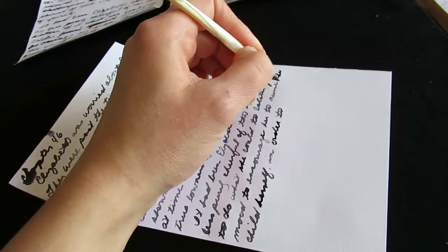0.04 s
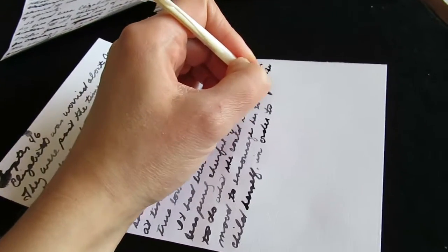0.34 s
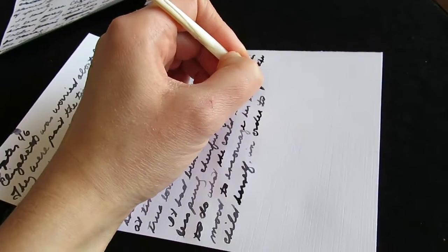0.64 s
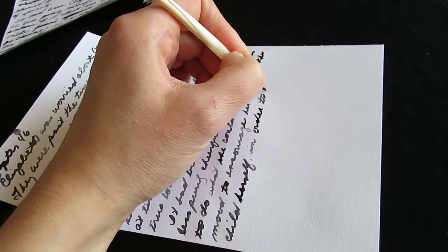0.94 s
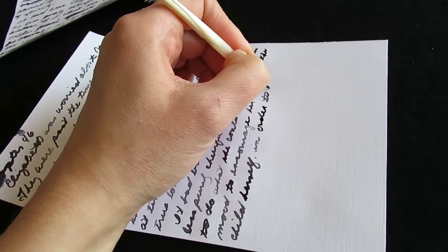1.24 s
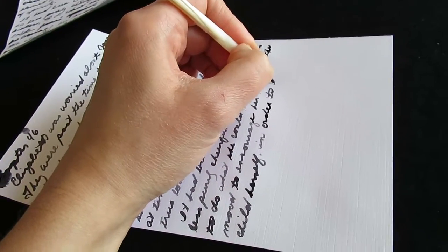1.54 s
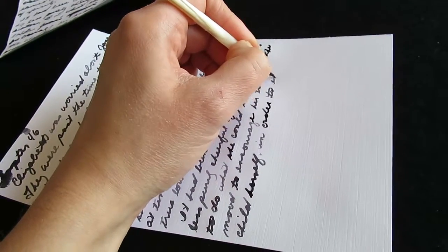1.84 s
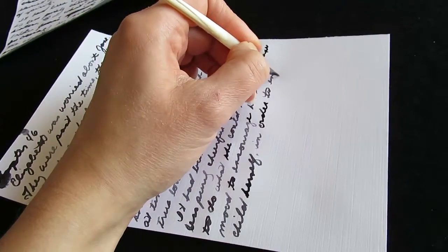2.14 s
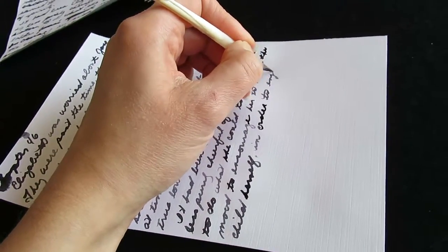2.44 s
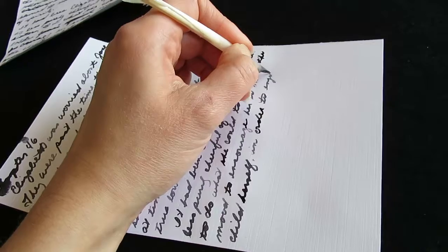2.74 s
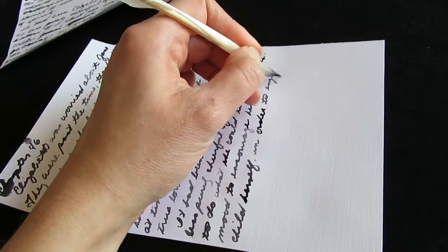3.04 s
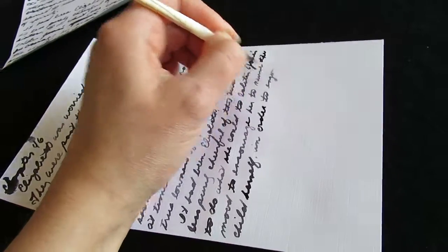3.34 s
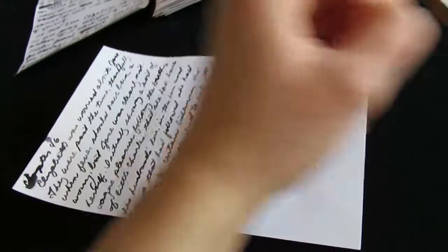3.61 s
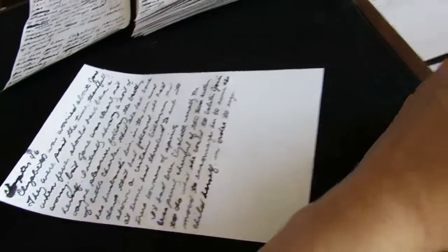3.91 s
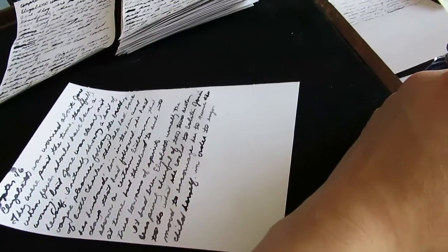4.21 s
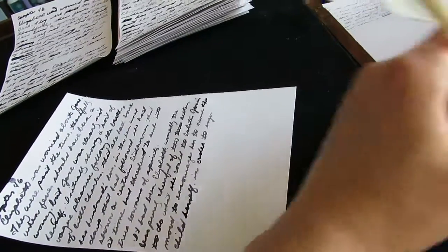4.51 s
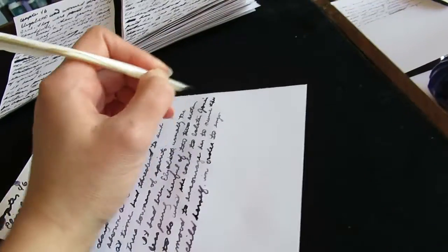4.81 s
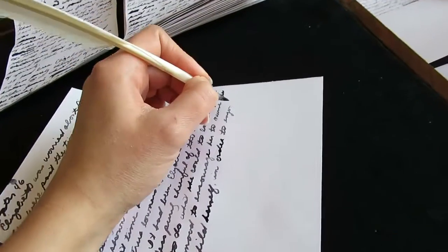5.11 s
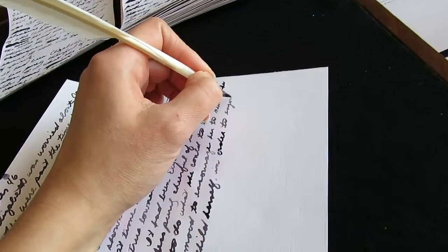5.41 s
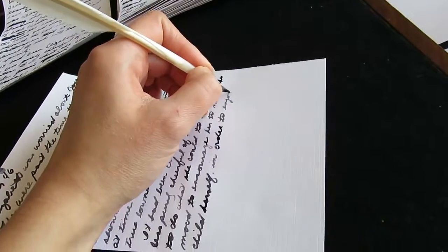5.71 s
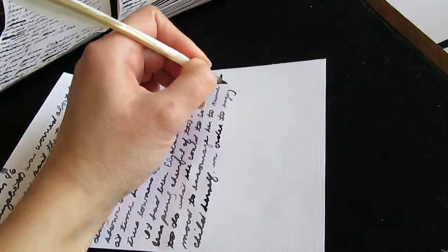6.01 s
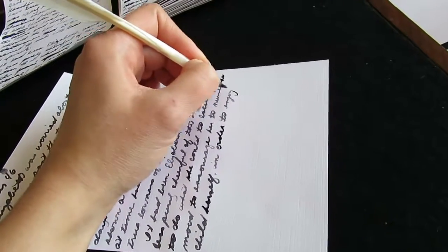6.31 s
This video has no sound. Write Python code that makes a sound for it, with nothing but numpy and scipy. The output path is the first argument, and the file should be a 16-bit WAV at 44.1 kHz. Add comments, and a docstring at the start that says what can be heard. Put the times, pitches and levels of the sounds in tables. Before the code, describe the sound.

A quiet room with low, steady air noise; at first a hand only brushes faintly over paper. At about 1.4 seconds a quill tip ticks down close to the microphone, and a faint, low appliance hum starts and stays to the end. From about 1.7 to 3.1 seconds the quill writes in short, bright scratches mixed with sharp little taps, strongest between 2.6 and 3.1 seconds, over the soft rub of skin on the page. The hand drags briefly, the tip ticks once more, and at about 3.3 seconds the hand bumps the wooden desk. A second, duller bump comes just before 4 seconds. Then there is only faint brushing. From about 5 seconds the hand scuffs lightly on the sheet, with a few very faint ticks and scratches of the tip and a slight, thin squeak of skin, until about 6.4 seconds.

```python
"""A quill writes a word on a sheet of paper lying on a wooden desk in a quiet room.
The nib ticks down, then moves in short strokes; stick-slip friction over the fibres excites the
resonances of quill and sheet. The hand brushes the page with friction noise and, on its way to the ink,
twice bumps the desk into free vibration. Behind them lie the room's air and a faint appliance hum."""
import sys
import numpy as np
from scipy import signal
from scipy.fft import rfft, irfft, next_fast_len
from scipy.io import wavfile
from scipy.ndimage import map_coordinates

SR = 44100
rng = np.random.default_rng(int(sys.argv[2]) if len(sys.argv) > 2 else 0)


def waveform_to_disk(signal):
    """Save audio, clipped to [-1, 1], as 16-bit WAV at the path in sys.argv[1]."""
    frames = np.transpose(np.atleast_2d(signal))
    scaled = np.clip(frames, -1, 1) * 32767
    samples = np.round(scaled).astype(np.int16)
    wavfile.write(sys.argv[1], SR, samples)


N = 280476
TIME = np.arange(N) / SR
SQUARE_HZ = 3873   # ring of a nib that meets the paper squarely


def nib_strokes(hollow_hz=294, push_db=-6, size=4096):
    """Forced vibration: friction drives the quill. Returns its sound and the force on the paper."""
    # t/s, length/s, level/dB, swell/dB, nib f/Hz (start, end), tine f/Hz (start, end),
    # slip rate/Hz (start, turn, end), roughness (0-1), sheet level/dB, edge level/dB
    strokes = [ (1.442, 0.0097, -48, -5, 4200, 4040, 11000, 10500, 2700, 1030, 650, 1, 4.5, 1),
               (1.696, 0.0074, -48, 3, 4100, 4200, 13000, 13000, 1300, 920, 710, 0.7, -5, -2),
               (1.71, 0.011, -39, 1, 4300, 4280, 13000, 13300, 1620, 1340, 860, .62, -1, -0.5),
               (1.778, 0.038, -45, -3, 2990, 3410, 14000, 13000, 1350, 1000, 740, 0.93, 5.5, 10),
               (1.823, 0.013, -61, 2, 2800, 2780, 13000, 13000, 1300, 1440, 1100, 1, 0, 0),
               (1.990, 0.044, -35.5, -1.5, 4470, 4600, 13000, 12500, 1260, 1800, 1380, 0.46, -4, 1),
               (2.034, 0.038, -42, 2, 3400, 3620, 13200, 13000, 2200, 1600, 550, 0.65, 5, 9),
               (2.186, .023, -37.5, -4, 2800, 2920, 13800, 13800, 1670, 980, 840, 0.56, -1, 11),
               (2.215, 0.047, -49, -1, 3100, 3620, 13300, 13200, 1380, 990, 910, 0.76, 5.5, 11.5),
               (2.265, .021, -36.5, 8, 4470, 4640, 12700, 13000, 1370, 1110, 920, 0.32, -4, 2),
               (2.283, 0.057, -52, -12, 3830, 2570, 13000, 13000, 1130, 1500, 1600, 1, 1, 11),
               (2.411, 0.031, -42, 1, 4425, 4450, 12000, 10700, 2050, 1380, 480, .45, -11, -1.5),
               (2.653, 0.021, -27.5, 3, 4460, 4546, 10000, 12300, 1450, 1150, 1110, 0.4, 0.5, 0),
               (2.674, 0.024, -36.5, -9, 4400, 2846, 13200, 13400, 1000, 1250, 1750, 0.65, 4, 11.5),
               (2.813, 0.056, -31.5, 6.5, 4580, 4626, 10800, 11100, 900, 1450, 360, 0.41, -5.5, -2.5),
               (2.927, .023, -41, 4, 2910, 3090, 13200, 13500, 1540, 1150, 720, 0.59, -4, 10.5),
               (2.991, .016, -39, 6, 3780, 3990, 13800, 13400, 2100, 1700, 1300, 0.5, 1, 9),
               (3.010, 0.02, -33, 7, 4655, 4410, 14000, 10100, 1660, 1300, 1250, .31, -2.5, 1.5),
               (3.03, .021, -32.5, 3, 4720, 4500, 10500, 11000, 1300, 1130, 1400, 0.53, 5, -9),
               (3.048, .024, -42, -4, 3250, 3020, 11000, 12000, 1450, 1480, 1450, .65, 7.5, 7),
               (3.072, 0.015, -35, 2, 3080, 3020, 13600, 13800, 1474, 1480, 1300, .55, 2, 12),
               (3.318, 0.0074, -38.5, 0, 4080, 4200, 12500, 12500, 1700, 2560, 2160, 0.78, -5, -0.5),
               (5.151, 0.031, -64, -8, 3020, 3160, 12500, 12500, 1500, 2040, 1800, 0.91, 1, -3),
               (5.79, .04, -61, 10, 3500, 4380, 12500, 12500, 650, 480, 400, 0.9, -9, -5),
               (6.309, .02, -66, 0, 3900, 4130, 12500, 12500, 800, 600, 500, .9, -5, -4)]
    sound, push, t = np.zeros(N), np.zeros(N), TIME[:size]
    for s, length, db, swell_db, nib0, nib1, tine0, tine1, *rates, rough, sheet_db, edge_db in strokes:
        ring_hz = np.interp(t, [0, length], [nib0, nib1])
        tine_hz = np.interp(t, [0, length], [tine0, tine1])
        force = amp(db) * fibre_catches(s + t) * stroke_force(t, length, swell_db, rates, ring_hz, rough)
        add(sound, s, quill(force, ring_hz, tine_hz, sheet_db, edge_db))
        add(push, s, amp(push_db) * force)
        # the nib's weight sounds the hollow under the sheet
        weight = amp(-2 + 0.62 * db) * contact(t, length) * rng.standard_normal(size)
        add(sound, s, resonance(lowpass(weight, 2 * hollow_hz), hollow_hz, width_hz=13))
    return sound, push


def stroke_force(t, length, swell_db, rates, ring_hz, rough, arch_db=2, grain_db=0.27, turn=0.38):
    """Sliding friction: the scratch swells or fades as its rasp glides through three given slip rates."""
    progress = ramp(t, length)
    contour_db = swell_db * (progress - .5) + arch_db * (np.sin(np.pi * progress) - 1)
    flutter_db = grain_db * wander(t, per_s=255)   # ridges of the paper
    rate = np.exp(np.interp(progress, [0, turn, 1], np.log(rates)))
    return contact(t, length) * amp(contour_db + flutter_db) * stick_slip(rate, ring_hz, rough)


def contact(t, length, bite_s=0.0035, lift_s=0.0037):
    """Contact envelope: 1 while the nib bears on the paper."""
    return ramp(t, bite_s) * ramp(length + lift_s / 2 - t, lift_s)


def stick_slip(per_s, ring_hz, rough, lock=0.61, jitter=0.3, uneven_db=1, rub_db=-8, count=600):
    """Entrainment: smooth slips pull into step with the nib's ring, rough ones scatter and rub; rms 1."""
    size = len(per_s)
    fibres = np.cumsum(np.exp(rough * jitter * rng.standard_normal(count))) - rng.random()
    free_at = np.searchsorted(np.cumsum(per_s) / SR, fibres)
    cycles = np.cumsum(ring_hz) / SR
    due = cycles[np.minimum(free_at, size - 1)]
    locked_at = np.searchsorted(cycles, due + lock * (1 - rough) * (np.round(due) - due))
    strength = amp(rough * uneven_db * rng.standard_normal(count)) * (due < cycles[-1])
    jolts = np.bincount(locked_at, strength, size)[:size] / np.sqrt(per_s)
    jolts = signal.lfilter([1, -1], [1, -np.exp(-2 * np.pi * 200 / SR)], jolts)   # 200 Hz high-pass
    return rms_one(rms_one(jolts) + rough * amp(rub_db) * rng.standard_normal(size))


def fibre_catches(t, half_s=0.0012):
    """Amplitude modulation of the force: raised fibres hold the nib back for an instant."""
    # catches: t/s, change of level/dB
    catches = [(1.811, -1), (1.835, 12), (1.9934, 8), (2.0, 8), (2.0063, 8), (2.0243, 4.5), (2.072, 5),
               (2.191, 3.5), (2.202, 9.5), (2.42, 9), (2.433, 9), (2.668, 4.5), (2.696, 4), (3.047, -3)]
    return amp(sum(db * np.exp(-.5 * ((t - s) / half_s) ** 2) for s, db in catches))


def quill(force, ring_hz, tine_hz, sheet_db=0, edge_db=0):
    """Modal resonance: on edge the nib rings higher and hisses; flatter, it drives the sheet harder."""
    # modes of the nib and of its split tip's tines: f/ring f, bandwidth/Hz, level/dB
    nib_modes = [(0.584, 319, -14.5), (.84, 352, -11), (1, 650, -1)]
    tine_modes = [(0.621, 1300, -10.5), (1, 2592, -3)]
    # modes of the sheet, the nib's edge and the shaft: f/Hz, bandwidth/Hz, level/dB
    sheet_modes = [(856, 120, -15), (1170, 200, -21.5), (1553, 68, -13.5), (1910, 190, -15),
                   (2770, 440, -21)]
    edge_modes = [(5030, 350, -14), (7320, 470, -13), (9270, 710, -15), (10300, 570, -14.5),
                  (12000, 600, -23)]
    shaft_modes = [(2960, 900, -3.5), (4360, 200, -1.5), (4720, 510, -2)]
    octaves = np.log2(ring_hz / SQUARE_HZ)
    # each spot on the sheet shifts and favours other modes, which glide as the nib travels
    octaves_per_s = 3.5 * rng.standard_normal()
    travel_hz = SQUARE_HZ * 2 ** (octaves_per_s * TIME[:len(force)])
    spot = [(hz / SQUARE_HZ * (1 + 0.037 * rng.standard_normal()), width, db + 3.5 * rng.standard_normal())
            for hz, width, db in sheet_modes]
    sheet = amp(sheet_db - 8 * octaves) * gliding(force, travel_hz, spot)
    hiss = bank(force, edge_modes) + gliding(force, tine_hz, tine_modes)
    body = lowpass(gliding(force, ring_hz, nib_modes) + sheet, 7500)
    tip = lowpass(body + amp(edge_db - 7 + 28.5 * octaves) * hiss, 15300, order=5)
    grip = 1 + 0.02 * rng.standard_normal()   # the fingers detune the shaft
    return tip + sum(amp(db) * resonance(tip, hz * grip, width) for hz, width, db in shaft_modes)


def nib_ticks(gain_db=1, tine_hz=13200, size=4096):
    """Impulse response: the nib lands or snags. Returns its sound and the force on the paper."""
    # impacts: t/s, level/dB, nib f/Hz
    ticks = [ (0.913, -35, 3200), (1.4161, -14.5, 4010), (1.784, -27, 2860), (1.899, -24, 3760),
             (1.9603, -16.5, 2700), (2.1646, -10.5, 2750), (2.237, -16, 2960), (2.5093, -13.5, 4380),
             (2.5790, -21, 3730), (2.8075, -7.5, 4300), (2.8710, -10, 4540), (2.914, -16.5, 2620),
             (2.9858, -5.5, 4470), (3.0827, -17.5, 3120), (3.3094, -14.5, 3400), (5.659, -38, 3780),
             (5.828, -34, 4630)]
    sound, push = np.zeros(N), np.zeros(N)
    for s, db, ring_hz in ticks:
        force = amp(gain_db + db) * (TIME[:size] == 0)
        snap = force - lowpass(force, 1500, order=1)   # too brief to move the sheet's slow modes much
        add(sound, s, quill(snap, np.full(size, ring_hz), np.full(size, tine_hz), edge_db=3))
        add(push, s, amp(0.5 - 11 * np.log2(ring_hz / SQUARE_HZ)) * force)   # on edge it pushes less
    return sound, push


def nib_skims():
    """Narrow-band friction noise: when the nib barely touches, only its tines sizzle."""
    # weightless passes: middle t/s, half length/s, level/dB
    skims = [(1.75, .07, -68), (2.053, .03, -66), (2.26, .07, -57), (2.513, .04, -67), (2.697, .015, -55),
             (2.89, .025, -52), (3.108, .032, -59)]
    envelope = np.linalg.norm([swell(*row) for row in skims], axis=0)
    return envelope * rms_one(resonance(rng.standard_normal(N), 13000, width_hz=2200))


def hand_bumps(size=1024):
    """Soft impact: the softer the hand's blow, the longer the push and the lower its cut-off."""
    # blows on the desk: t/s, level/dB, cut-off f/Hz
    blows = [(3.284, -53, 1490), (3.3275, -34.5, 3020), (3.33, -24.5, 1590), (3.3340, -26, 298),
             (3.9495, -26, 630), (3.9521, -22.5, 344)]
    force, impulse = np.zeros(N), 1. * (TIME[:size] == 0)
    for s, db, soft_hz in blows:
        add(force, s, amp(db) * lowpass(impulse, soft_hz, order=3))
    return force


def desk(force):
    """Damped plate vibration: blows set the desk top ringing; a panel radiates no deep bass."""
    # modes of the top: f/Hz, level/dB, T60/s
    modes = [(141.6, -7, 0.34), (170, -10, 0.14), (219, -7, 0.13), (255, -3.5, 0.082), (283.2, -14, 0.3),
             (369, -14.5, 0.073), (411, -2.5, 0.035), (488, -18, 0.088), (720, -12, .036),
             (1000, -11, 0.046), (1300, 0, 0.024), (1590, -19, .018), (1770, -16, .016)]
    ringing = 0
    for hz, db, t60 in modes:
        r, w = amp(-60 / (t60 * SR)), 2 * np.pi * hz / SR
        ringing += amp(db) * signal.lfilter([.5, 0, -.5], [1, -2 * r * np.cos(w), r * r], force + 1e-18)
    return highpass(ringing, 115, order=3)


def hand(word_start_s=1.56, word_end_s=3.5, word_fade_s=0.054, arm_fade_s=0.097, settled_s=5.8):
    """Friction of skin on paper: light contact brushes brightly, weight gives a darker drag."""
    # finger scuffs, and the heel of the hand dragging: middle t/s, half length/s, level/dB
    scuffs = [(0.011, 0.047, -62.5), (0.233, 0.017, -58.5), (0.343, 0.046, -66.5), (1.027, 0.018, -63),
              (1.114, 0.019, -60.5), (1.265, 0.011, -63), (1.467, 0.093, -65), (1.581, 0.012, -56.5),
              (1.724, 0.05, -58.5), (3.381, 0.0048, -53.5), (3.529, 0.011, -60.5), (3.595, 0.015, -60.5),
              (3.75, 0.0099, -64), (3.97, 0.04, -64.5), (4.577, 0.017, -65.5), (5.052, 0.061, -65.5),
              (5.165, 0.02, -58.5), (5.256, 0.027, -61.5), (5.878, 0.08, -59.5), (6.322, 0.014, -60)]
    heel_drag = (3.135, 0.023, -47.5)
    # the arm travels to the ink and back, then settles: t/s, level/dB
    arm_level = [(3.45, -66), (3.77, -77), (3.98, -62), (4.54, -77), (4.57, -66), (5.69, -78), (5.87, -63),
                 (6.36, -59.5)]
    # modes of dragging skin and of the sheet under the hand's weight: f/Hz, bandwidth/Hz, level/dB
    drag_modes = [(263, 77, -0.5), (780, 490, -1), (1550, 88, -9), (2270, 410, -5)]
    pressed_modes = [(263, 44, 4.5), (434, 75, -14.5), (763, 99, -9)]
    word = amp(-62) * ramp(TIME - word_start_s, word_fade_s) * ramp(word_end_s - TIME, word_fade_s)
    flutter_db = 2.4 * wander(TIME, per_s=90)   # skin catches and lets go
    arm_db = np.interp(TIME, *np.transpose(arm_level)) + flutter_db
    arm = amp(arm_db) * ramp(TIME - word_end_s, arm_fade_s)
    heel = swell(*heel_drag)
    touches = [amp(-10) * arm, amp(-7) * heel] + [swell(*row) for row in scuffs]
    light = np.linalg.norm(touches, axis=0)   # independent noises add in power
    brush = np.hypot(word, light) * skin_rub() + amp(-4.5) * light * fibre_crackle()
    drag = amp(2.5) * arm * bank(rng.standard_normal((2, N)), drag_modes)
    pressed = (heel + amp(3) * word) * bank(rng.standard_normal(N), pressed_modes)
    squeak = amp(-0.5) * arm * ramp(TIME - settled_s, arm_fade_s) * skin_squeak()
    return amp(2) * brush + drag + pressed + squeak


def skin_rub(grain_db=1):
    """Broadband friction noise, modulated as skin snags on the paper's fibres."""
    # brushing spectrum: f/Hz, spectral level/dB
    spectrum = [(710, -21), (1200, -1.5), (1590, -25), (1910, -8), (2450, -7), (2680, -1.5), (5020, -9),
                (6100, -10.5), (9820, -14.5), (12300, -15), (14500, -17), (16000, -36)]
    return amp(grain_db * wander(TIME, per_s=310, count=8192)) * diffuse_noise(spectrum)


def fibre_crackle(per_s=600, spread_db=2.5):
    """Poisson impacts: single fibres flick free of the skin, each ringing one mode; rms 1."""
    # small modes of the sheet: f/Hz, bandwidth/Hz, level/dB
    modes = [(1580, 140, -8), (2400, 170, -2.5), (3130, 400, -2.5), (4310, 360, -2), (5040, 550, -1.5),
             (6740, 690, -7.5), (12500, 2400, -5)]
    flicks = (rng.random(N) < per_s / SR) * amp(spread_db * np.minimum(rng.exponential(1, N), 4))
    struck = rng.integers(0, len(modes), N)
    return rms_one(sum(bank(flicks * (struck == k), [mode]) for k, mode in enumerate(modes)))


def skin_squeak(hz=2430, waver_hz=44.7, width_hz=180, fits_per_s=60, fits_db=2):
    """Modulated narrow-band noise: sliding skin squeaks thinly, in fits, at a wavering pitch; rms 1."""
    cycles = np.cumsum(hz + waver_hz * wander(TIME, fits_per_s)) / SR
    rasp = lowpass(rng.standard_normal((2, N)), width_hz / 2)
    return rms_one(rasp * amp(fits_db * wander(TIME, fits_per_s)) * np.cos(2 * np.pi * cycles))


def direct_path(x, lag_s=0.000012):
    """Path difference and comb filtering: the nib is nearer the right; close surfaces colour each side."""
    # echoes off desk, hand and book, left then right: delay t/s, level/dB
    echoes = [
        [(.0029, -21)],
        [(.00132, -45), (.00297, -27)],
    ]
    direct = np.array([delayed(x, lag_s), x])
    return direct + np.array([sum(amp(db) * delayed(x, s) for s, db in ear) for ear in echoes])


def scattering(x, db=-3, longest_s=0.0023, shifts_per_s=22, count=16):
    """Scattering: short waves glance off the moving fingers along paths that come and go."""
    treble = highpass(x, 6000, order=4)
    ears = [sum(wander(TIME, shifts_per_s) * np.roll(treble, round(lag_s * SR))
                for lag_s in longest_s * rng.random(count)) for _ in range(2)]
    return amp(db) * np.array(ears) / np.sqrt(count)


def room(x, t60=0.34, early_db=6, early_s=0.0057, gap_s=0.0028, size=24000):
    """Reverberation: early reflections off books and walls, then a short exponential tail."""
    # colour of the reflections: f/Hz, level/dB
    colour = [(100, -25), (300, 12), (700, 5.5), (1500, 8.5), (3000, 7), (4500, 2), (6000, 6.5),
              (9000, 3.5), (15000, -5.5)]
    t = TIME[:size]
    decay = (amp(-60 * t / t60) + amp(early_db) * np.exp(-t / early_s)) * ramp(t - gap_s, gap_s)
    mid, side = rng.standard_normal((2, size))
    side = highpass(side, 520)   # long waves reach both ears alike
    noise = rms_one(np.array([mid + side, mid - side]))
    echoes = irfft(rfft(noise) * amp(per_bin(colour, size)), size) * decay / np.linalg.norm(decay)
    return signal.fftconvolve(x[None], echoes, axes=1)[:, :N]


def appliance_hum(start_s=1.496, rise_s=0.067, level_db=-48.5):
    """Line spectrum: a motor starts somewhere in the house and drones on."""
    # partials: f/Hz, level/dB
    partials = [(120, -4), (202, -15.5), (290, -20)]
    drone = sum(amp(db) * np.sqrt(2) * np.sin(2 * np.pi * (hz * TIME + rng.random())) for hz, db in partials)
    return amp(level_db) * ramp(TIME - start_s, rise_s) * drone


def room_air(level_db=-50):
    """Stationary ambient noise, strongest in the bass."""
    # spectrum of the still room: f/Hz, spectral level/dB
    spectrum = [(12, -63), (20, -13), (53, -8), (86, -6), (123, -7.5), (172, -7.5), (204, -8.5),
                (228, -8.5), (472, -16), (527, -20.5), (849, -19.5), (2080, -27), (4420, -33), (12800, -46),
                (16000, -52)]
    return amp(level_db) * diffuse_noise(spectrum)


def diffuse_noise(spectrum):
    """Diffuse field: stereo noise, alike on both sides only in the bass; rms 1."""
    # likeness of left and right: f/Hz, correlation
    correlation = [(60, 0.98), (150, 1), (380, 0.094), (950, -0.14), (2380, -0.4), (5980, -0.25),
                   (15000, -0.58)]
    size = next_fast_len(N)
    mid, side = rfft(rng.standard_normal((2, size)))
    alike = per_bin(correlation, size)
    both = np.sqrt(1 + alike) * mid + np.sqrt(1 - alike) * side * [[1], [-1]]
    return rms_one(irfft(both * amp(per_bin(spectrum, size)), size)[:, :N])


def resonance(x, hz, width_hz):
    """Damped oscillator: a two-pole band-pass with peak gain 1."""
    r = np.exp(-np.pi * width_hz / SR)
    poles = [1, -2 * r * np.cos(2 * np.pi * hz / SR), r * r]
    return signal.lfilter(np.array([1, 0, -1]) * (1 - r * r) / 2, poles, x + 1e-18)


def bank(x, modes):
    """Modal superposition; each level is the share of white-noise power that the mode passes."""
    return sum(amp(db) * np.sqrt(SR / (np.pi * width)) * resonance(x, hz, width) for hz, width, db in modes)


def gliding(force, pitch_hz, modes, count=8):
    """Time-varying resonance: modes follow a moving pitch by fading between fixed tunings."""
    steps = np.linspace(pitch_hz.min(), pitch_hz.max() + 1, count)
    tunings = [bank(force, [(hz * ratio, width, db) for ratio, width, db in modes]) for hz in steps]
    return sum(np.interp(pitch_hz, steps, share) * tuned for share, tuned in zip(np.eye(count), tunings))


def lowpass(x, hz, order=2):
    """Maximally flat low-pass."""
    return signal.sosfilt(signal.butter(order, hz, fs=SR, output="sos"), x + 1e-18)


def highpass(x, hz, order=2):
    """Maximally flat high-pass."""
    return signal.sosfilt(signal.butter(order, hz, "high", fs=SR, output="sos"), x)


def per_bin(points, size):
    """Interpolate (f/Hz, value) points over log frequency at the bins of a transform."""
    hz, value = np.transpose(points)
    return np.interp(np.log(np.arange(size // 2 + 1) * SR / size + 1e-3), np.log(hz), value)


def delayed(x, lag_s):
    """Propagation delay, to a fraction of a sample."""
    return map_coordinates(x, [np.arange(N) - lag_s * SR], order=3)


def ramp(t, rise_s):
    """Linear rise from 0 to 1, starting at t = 0."""
    return np.clip(t / rise_s, 0, 1)


def swell(s, half_s, db):
    """Bell-shaped envelope around a moment."""
    return amp(db) * np.exp(-.5 * np.minimum(np.abs(TIME - s) / half_s, 10) ** 2)


def wander(t, per_s, count=1024):
    """Random modulation of spread about 1, reaching a new value per_s times a second."""
    return np.interp(t * per_s, np.arange(count), rng.standard_normal(count))


def add(track, s, sound):
    """Superpose a short sound at a time."""
    at = round(s * SR)
    track[at:at + len(sound)] += sound[:N - at]


def amp(db):
    """Level to amplitude ratio."""
    return 10 ** (np.asarray(db) / 20)


def rms_one(x):
    """Scale to unit power."""
    return x / np.sqrt(np.mean(x ** 2) + 1e-20)


def scene():
    """Superposition: quill and desk close by, over the brushing hand and the still room."""
    strokes, stroke_push = nib_strokes()
    ticks, tick_push = nib_ticks()
    scratch = strokes + ticks + nib_skims()
    push = resonance(stroke_push + tick_push, 295, width_hz=80)   # the sheet bounces on the air under it
    wood = desk(hand_bumps() + amp(-25) * push)
    skin = hand()
    air = room_air()
    reflections = room(amp(-14) * scratch + amp(-13) * wood)
    return direct_path(scratch) + scattering(scratch) + wood + skin + reflections + air + appliance_hum()


def record(dry, treble_hz=14600, cutoff_hz=16000):
    """Band limiting: the microphone's treble rolls off, then the top is cut steeply."""
    soft = lowpass(dry, treble_hz, order=4)
    return signal.sosfilt(signal.ellip(10, .1, 80, cutoff_hz, fs=SR, output="sos"), soft)


dry = scene()
out = record(dry)
waveform_to_disk(out)
```